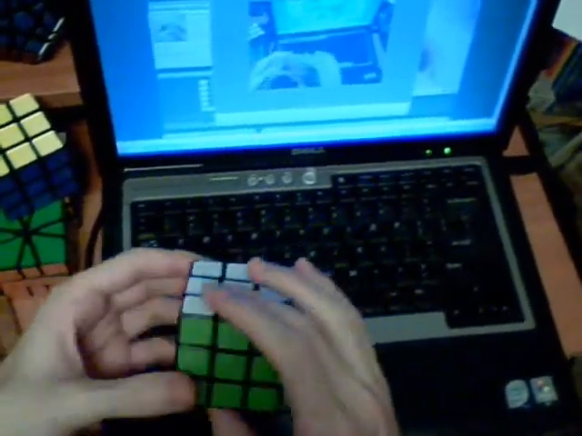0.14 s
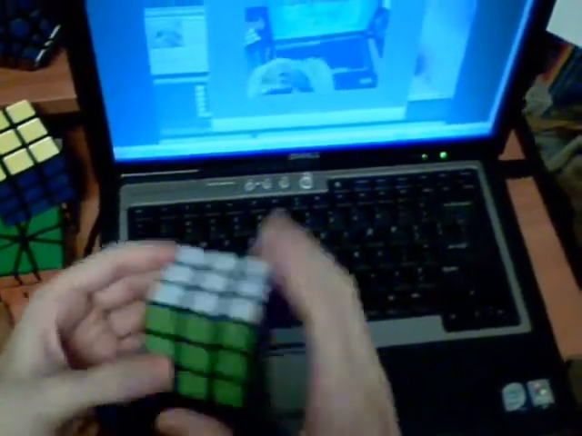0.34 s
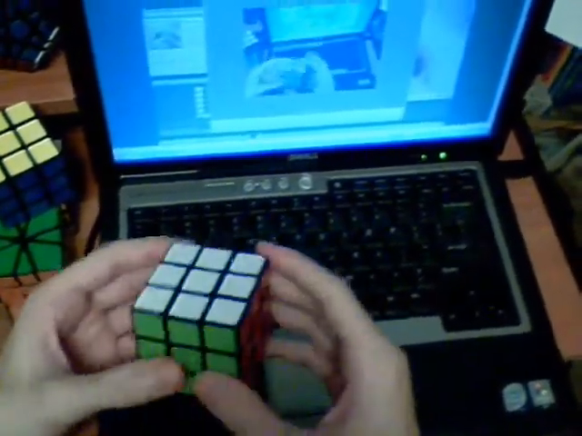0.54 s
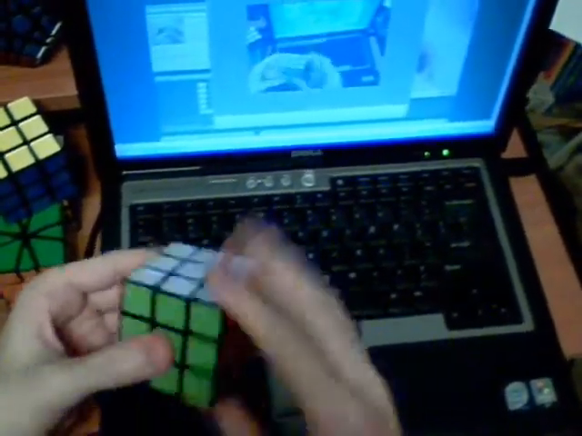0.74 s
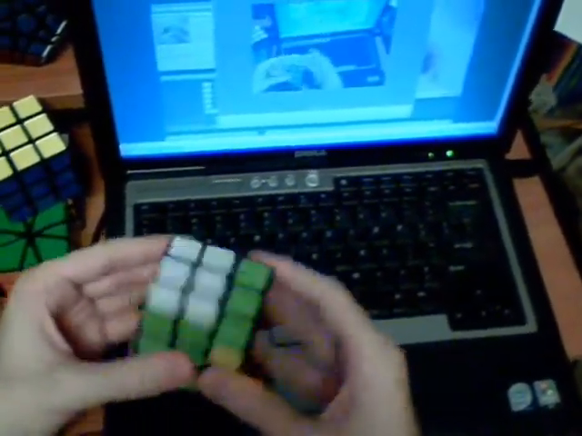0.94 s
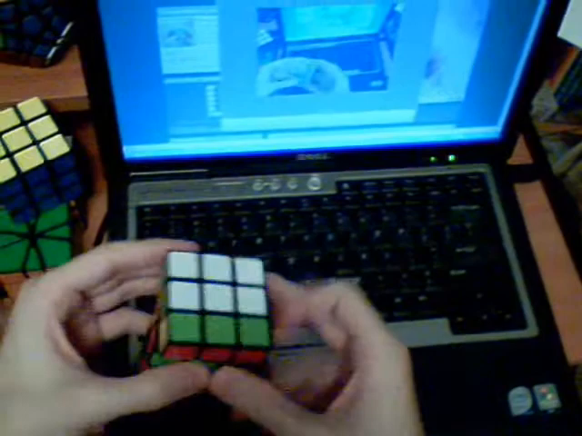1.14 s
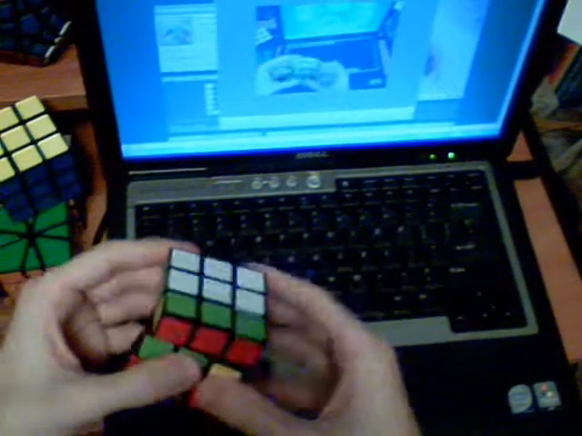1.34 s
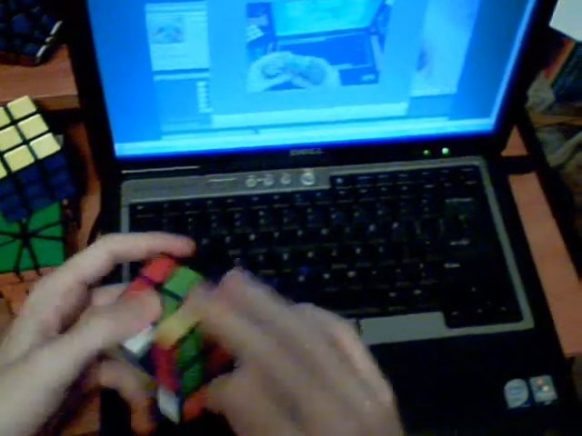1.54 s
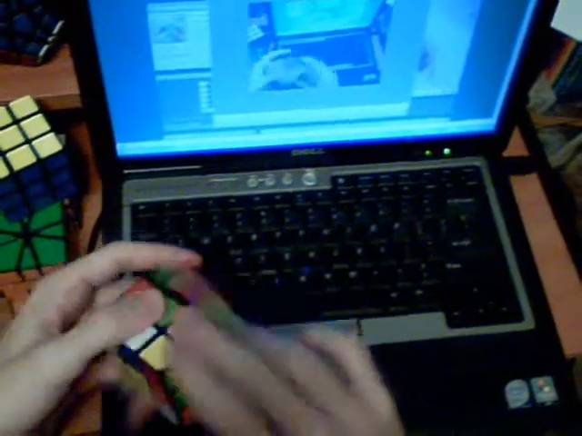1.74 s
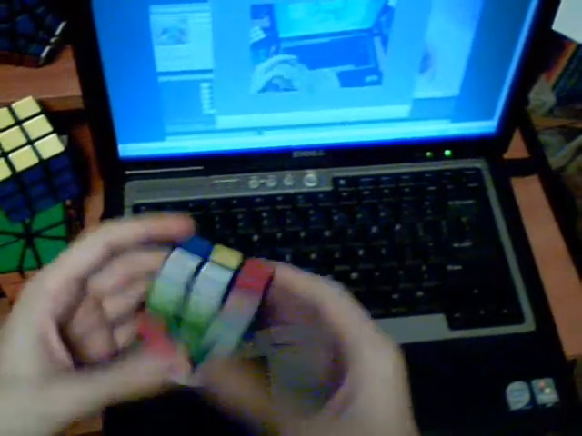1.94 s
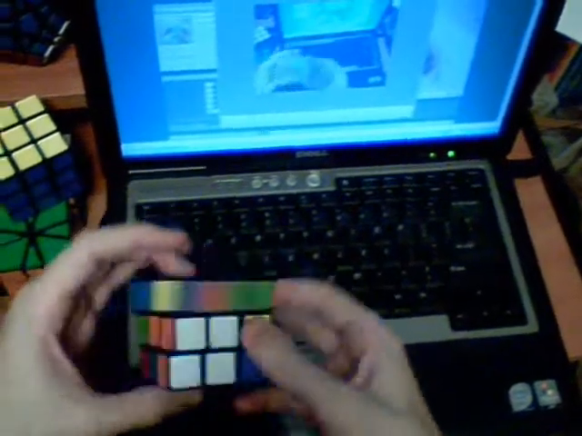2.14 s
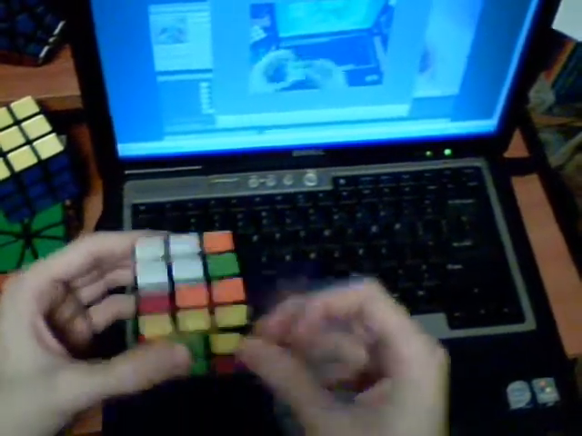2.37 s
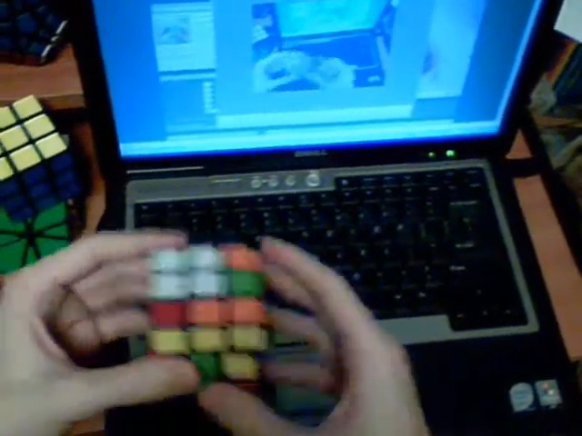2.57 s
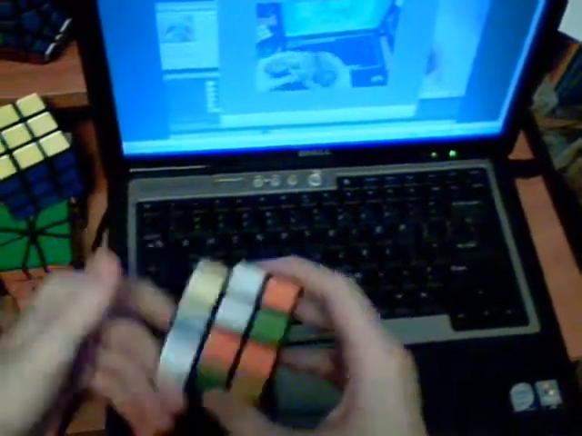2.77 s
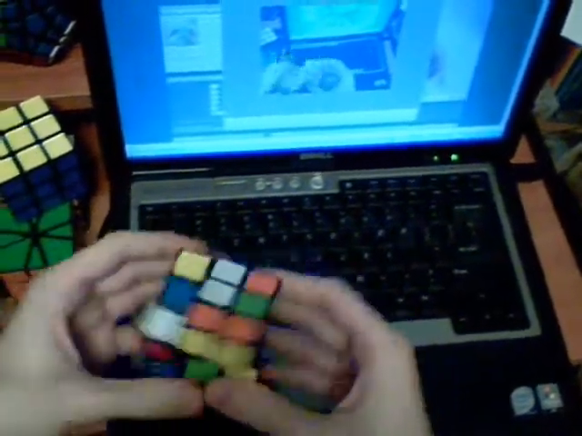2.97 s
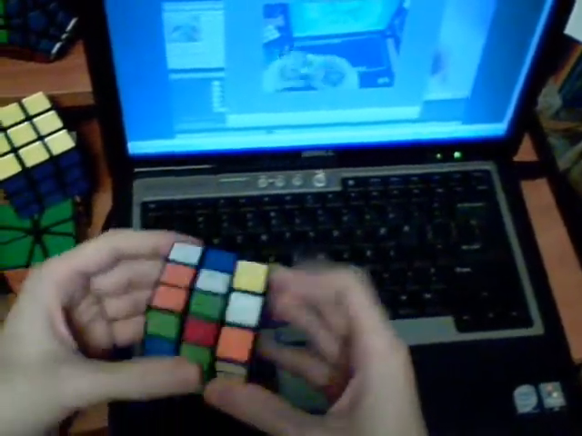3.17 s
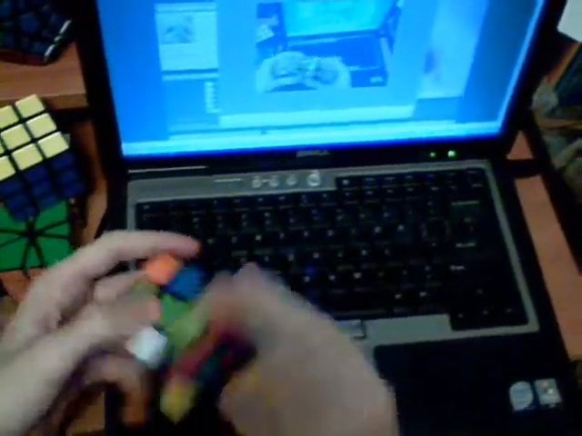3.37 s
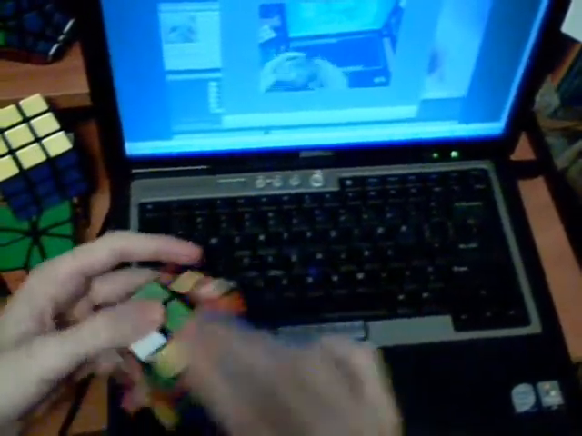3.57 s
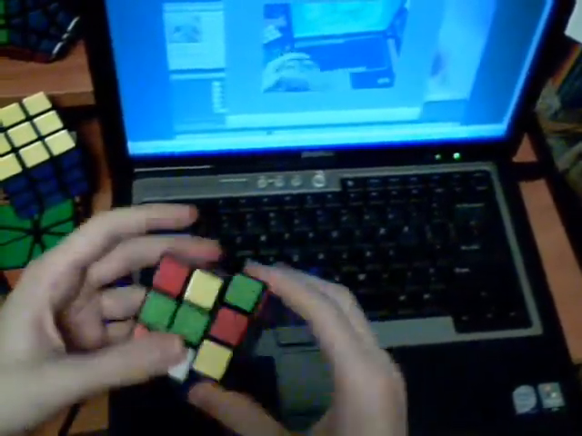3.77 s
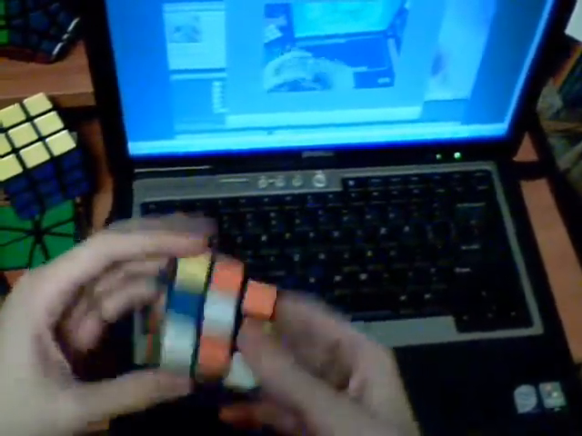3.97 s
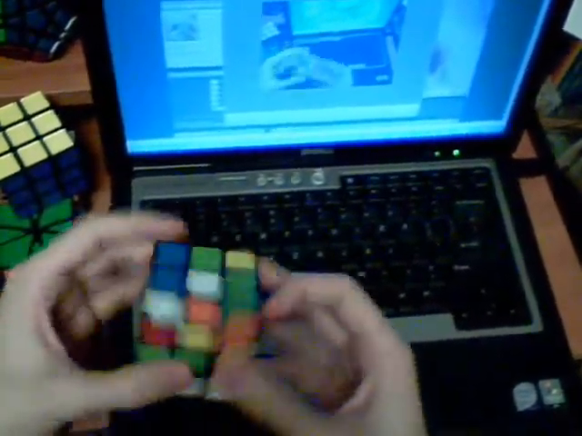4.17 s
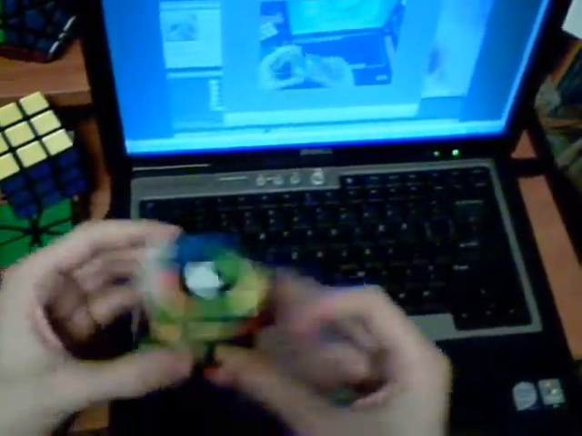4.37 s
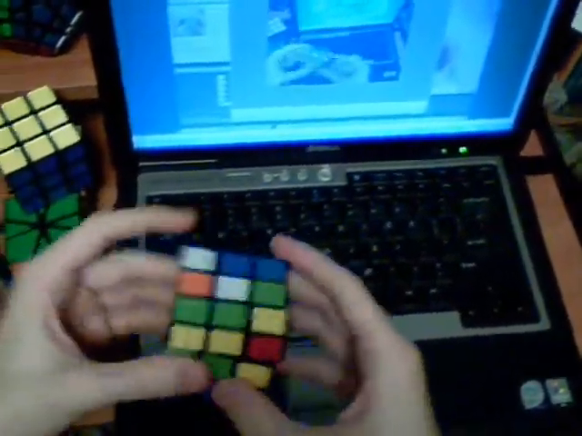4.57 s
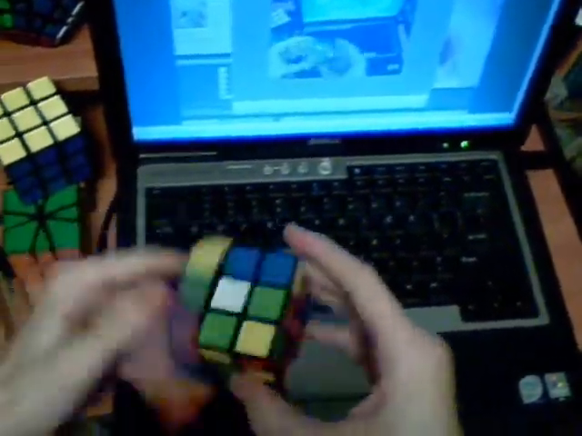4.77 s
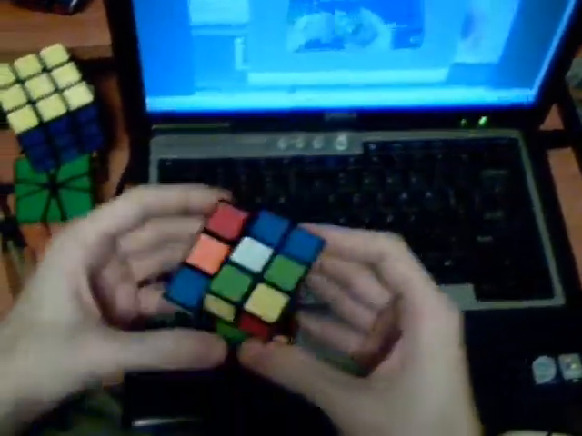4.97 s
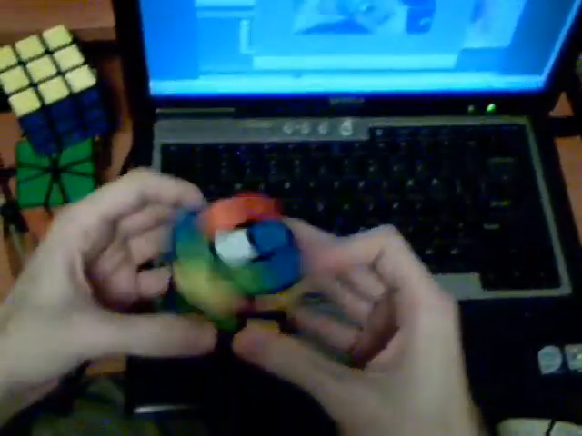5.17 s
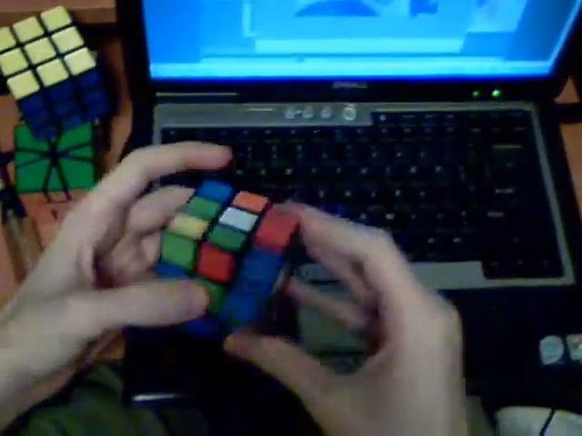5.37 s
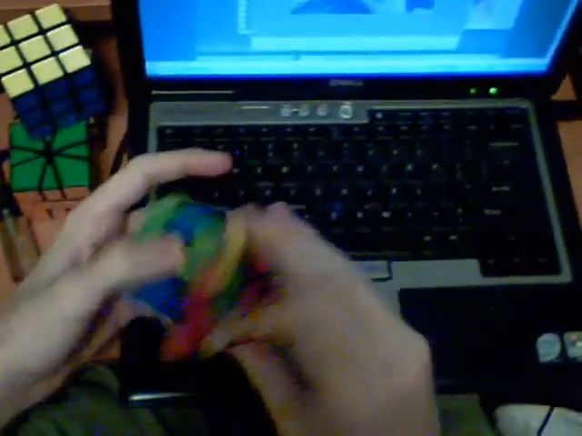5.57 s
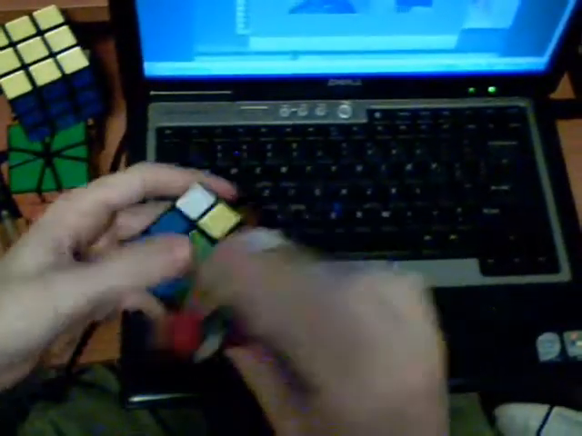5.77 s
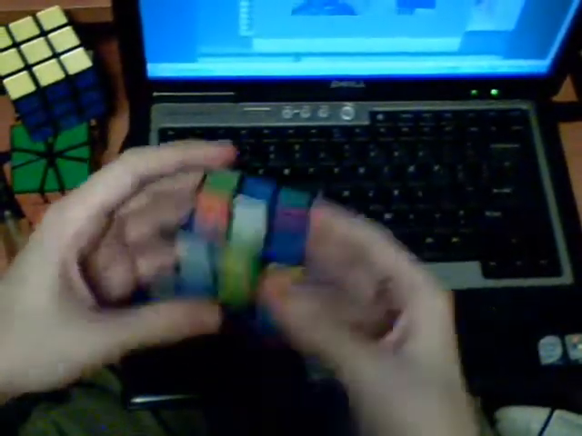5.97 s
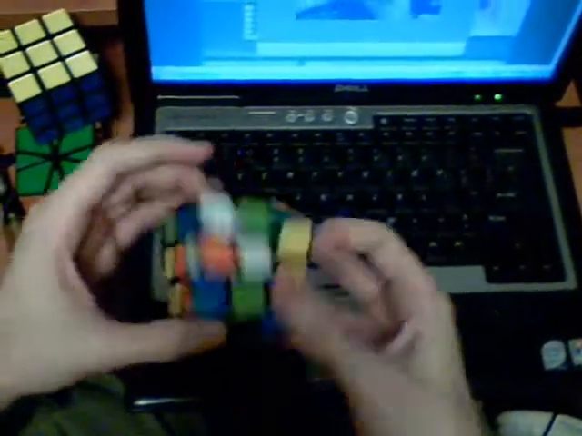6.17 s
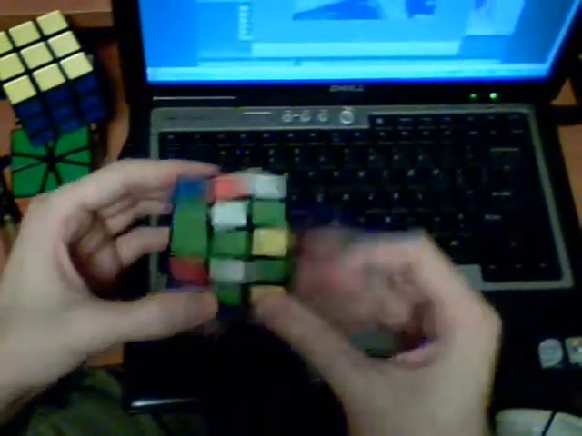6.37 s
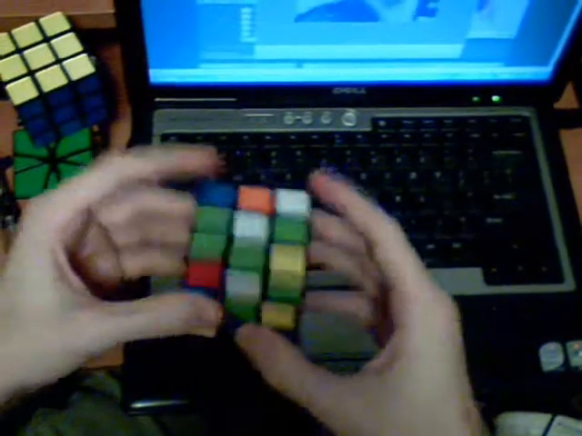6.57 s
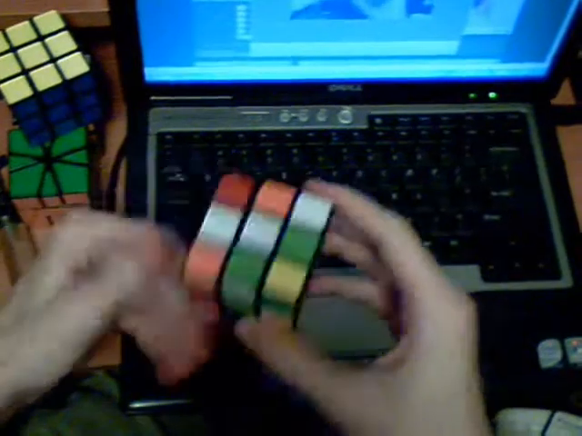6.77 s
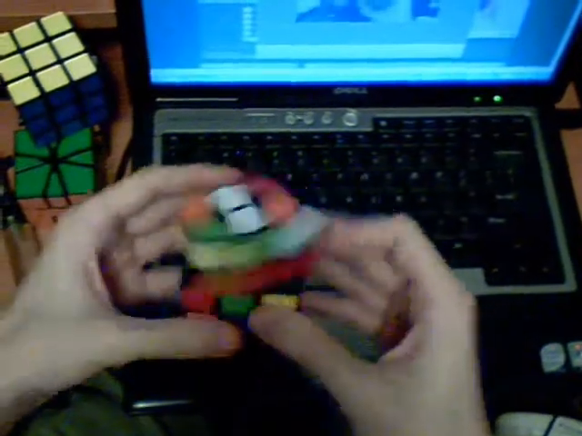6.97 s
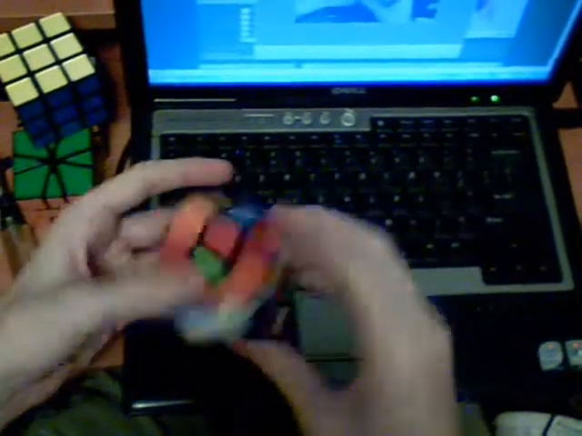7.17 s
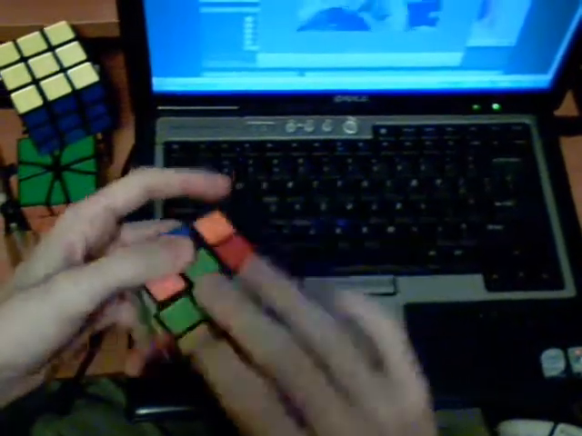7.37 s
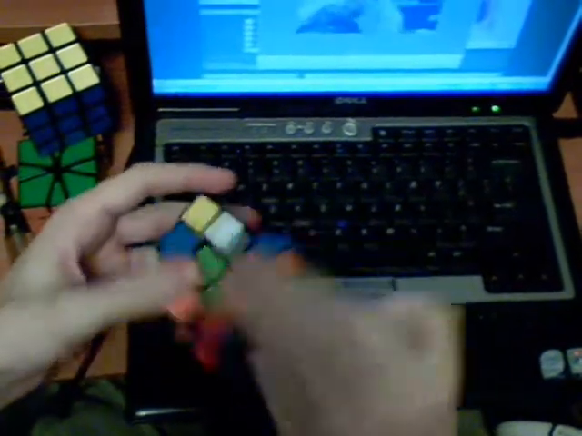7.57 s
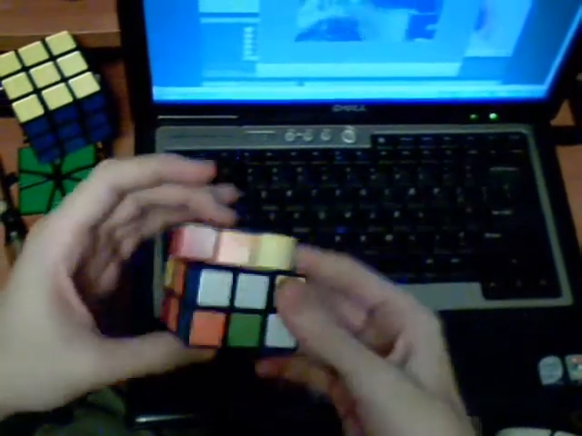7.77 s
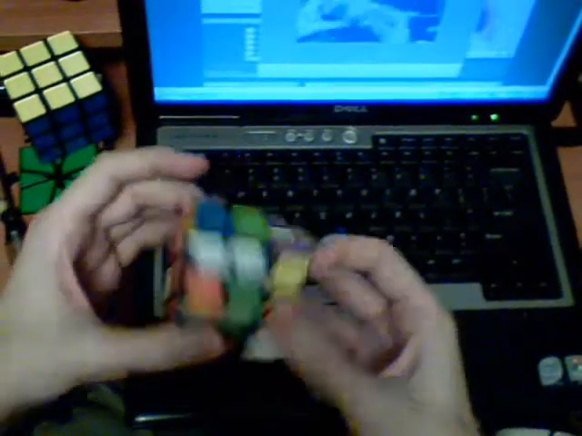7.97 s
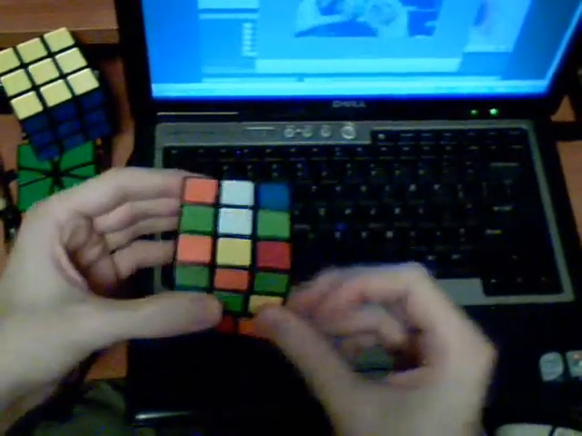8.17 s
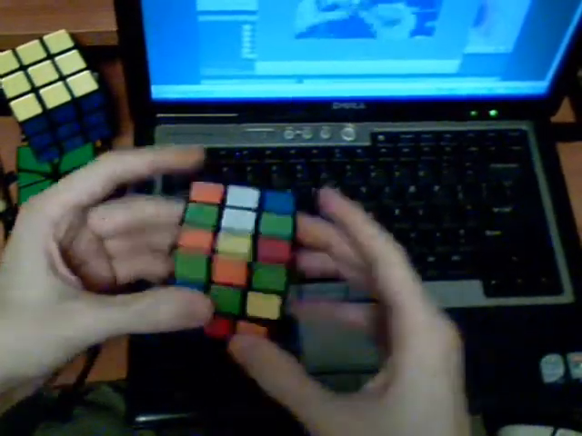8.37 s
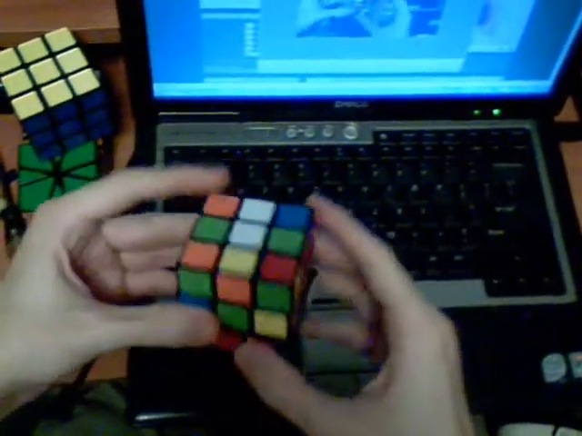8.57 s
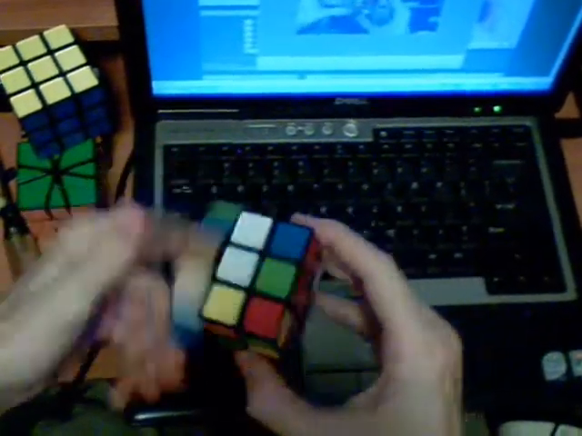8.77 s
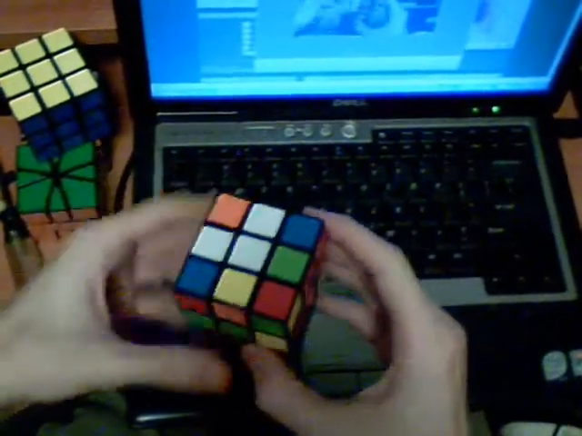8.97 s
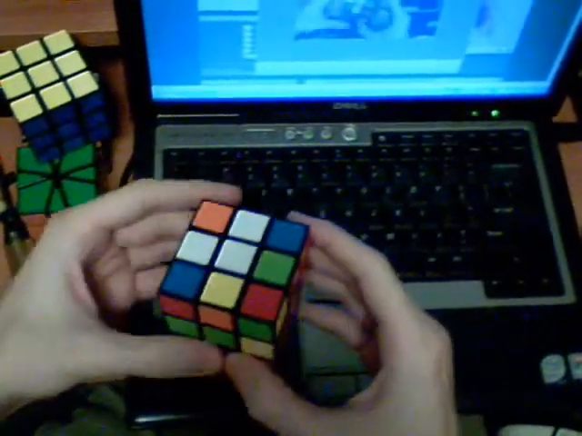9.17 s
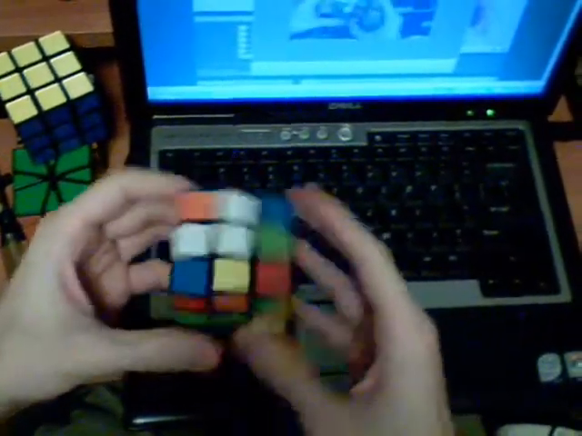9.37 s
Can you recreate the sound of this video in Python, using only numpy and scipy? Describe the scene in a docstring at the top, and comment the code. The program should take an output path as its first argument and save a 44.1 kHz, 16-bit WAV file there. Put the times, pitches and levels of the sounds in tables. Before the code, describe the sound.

A small, quiet room with the microphone close to the hands. From 0 to 0.8 seconds only a laptop is heard: a low wavering hum, a thin whine, soft vent air and faint high hiss. Then a plastic puzzle cube starts turning in fast, irregular clicks, with a strong snap near 1.4 and louder clacks at 1.8 and 2.0. Dense flurries follow around 2.7, 3.0 to 3.9 and a hard cluster at 4.3. After a short gap, clicks resume at 4.6, with lighter sliding ticks and steady snapping from 5.3 to 6.3. It thins briefly, then strong clacks strike near 7.2 and 7.5, loose pieces rattling around them. Clicking eases by 8.1, leaving a pause of about half a second; a last quick burst at 8.7 ends with a sharp clack. Only the quiet fan hum remains afterwards.

```python
"""Puzzle cube over a laptop

A plastic puzzle cube is twisted fast in two hands over a desk, close to the microphone.
Pieces snap past each other in clicks and clacks: noise bursts shaped by the plastic, each with a brief ring.
Soft ticks make the loose rattle and the sliding layers; every blow dies away in shaking pieces and a small room.
An open laptop hums with unsteady sine tones and blows with shaped noise underneath, below a faint high hiss."""
import sys
import numpy as np
from scipy.fft import rfft, irfft, next_fast_len
from scipy.io import wavfile
from scipy.ndimage import uniform_filter1d, map_coordinates

SR = 44100
rng = np.random.default_rng(int(sys.argv[2]) if len(sys.argv) > 2 else 0)


def digitize_waveform(pressure):
    """Quantize a signal to 16-bit integers and store it at the path in sys.argv[1].

    Rows of a 2-D input are taken as channels; values are limited to [-1, 1].
    """
    field = np.atleast_2d(pressure).T
    bounded = np.clip(field, -1, 1)
    quanta = np.round(bounded * 32767).astype(np.int16)
    wavfile.write(sys.argv[1], SR, quanta)


N = 415422

# disk spindle, the fan's blade rate with multiples, and a whine, before flutter:
# (frequency [Hz], rms level [dB])
LAPTOP_TONES = [(59, -62), (90, -55), (242, -54), (484, -56), (789, -54), (1578, -58)]
# air through the laptop's vent, before its slow swell: (frequency [Hz], density [dB per Hz])
VENT_AIR = [(20, -74.5), (45, -93), (110, -79.5), (170, -74), (300, -79), (430, -74.5), (680, -71.5),
            (880, -77.5), (1150, -81), (1500, -79), (2500, -79), (3300, -86.5), (5500, -97), (9000, -110)]
# snaps and single ticks of piece on piece, loud and soft, knock and thud relative to each:
# (time [s], level [dB], knock [dB], thud [dB])
PIECE_SNAPS = [(0.816, -6, -6, -18.5), (0.8188, -3.5, -11, -12), (0.8343, -10.5, -1, 6),
               (0.8747, -10.5, 6, -4), (0.8946, 2.5, -17, -19), (0.9144, -1, -7, -19),
               (0.9447, 6, -2.5, -6), (0.9803, -13, 7, 6), (0.989, -4, -2.5, -3), (1.0074, -11.5, -4, 7),
               (1.0252, -8, -4, -1), (1.0774, -13, -9, 1), (1.312, -18, -8, -5), (1.0884, -4.5, -5, -6),
               (1.1039, -5, 0, -2), (1.3629, -4, -6, -6), (1.3885, -1.5, -2, -14), (1.4013, -1.5, -4, -5),
               (1.432, -1, -1, -10), (1.4378, 11.5, -7.5, -14), (1.465, 0.5, -4, -0.5), (1.4763, -3, 0, -7),
               (1.4979, -2.5, 1.5, -2.5), (1.531, -5.5, 5, 2.5), (1.5435, 0, 0, -12),
               (1.588, -10.5, -5, -5), (1.633, 0, 0, -6), (1.7023, -5, 3, -12), (1.7087, -1, 1.5, -8),
               (1.7216, -4.5, 1, -5), (1.7705, -15, 1, 3), (1.8207, 14, -2, -5.5), (1.8942, -10, 2, 1),
               (1.931, 0, -2, -9), (1.9587, -7, 2.5, 4), (2.0195, 12, -14, -13.5), (2.0246, 6, -0.5, -5.5),
               (2.088, 0, -1.5, -2.5), (2.093, 2, -4.5, -11), (2.1514, -15, -3, -1),
               (2.1885, -4.5, -7, -4.5), (2.209, -11.5, 5.5, -2), (2.2193, -9, -1, 2),
               (2.2496, -3, -8, -17), (2.2924, -2.5, -1, -11), (2.2996, 2, -4.5, -11), (2.3193, 1, -3, -12),
               (2.3293, 6, -5, -9), (2.3385, -5.5, 0, -18), (2.4442, -6.5, -21, -24),
               (2.467, -13, -19, -15), (2.6215, -9, 2.5, -3), (2.6668, -6.5, 2, -3), (2.686, -0.5, -3, 8),
               (2.7051, 11, -3.5, -8), (2.7266, -6, 3, -3), (2.7446, 7, -4.5, -5.5),
               (2.9663, -12.5, -7, -5), (3.028, 6, -1.5, -9.5), (3.0478, -1, -4, -12),
               (3.054, 5, -7.5, -8.5), (3.116, -18, -6, -8), (3.138, -20, 1, -8), (3.187, -15, -4, -5),
               (3.2088, -18, -3, 4), (3.2302, -13, 3, -9), (3.2454, -6, -16, -6), (3.2621, 9.5, -4, -6),
               (3.2833, -4, -2, -3), (3.2944, -6, 7, -9), (3.31, 2.5, -0.5, -2), (3.3194, 6, -5, -6),
               (3.3504, -6.5, 5, -2), (3.4351, -6.5, 5, -4.5), (3.469, -16.5, 0, 0),
               (3.5274, -1.5, -7, -14), (3.5618, 4.5, 1.5, -5), (3.5679, 10, -3.5, -12),
               (3.5763, 6, -5, -12), (3.6824, -11, 2, -10), (3.6885, -0.5, -2, -6),
               (3.6963, 10.5, -8.5, -10.5), (3.7002, -3.5, 0, 0.5), (3.708, -2, -0.5, -2),
               (3.8163, -8, 3, 3.5), (3.821, -3, -1, -9), (3.8446, -3.5, 2, 4), (3.8648, -8.5, -2, 1),
               (3.882, -5, 4, -6), (4.0922, -5, 1.5, -3), (4.1174, -10.5, 5.5, -9), (4.1851, 0, -4, -9),
               (4.19, -3.5, -1, -7), (4.2794, -17, -1, -12), (4.2953, 6.5, -3, 1), (4.299, 10, -3, -19),
               (4.311, 0, 7.5, 2.5), (4.319, 12, -6.5, -31), (4.3218, 10, -9, -6.5), (4.684, 0.5, -9, -7),
               (4.715, -5, 4.5, -1.5), (4.7246, -1, -10, -6), (4.7414, -4, 2.5, 0.5),
               (4.931, -13.5, -4, 6.5), (5.018, -16, -7, -7), (5.088, -8, -3, -3), (5.1067, 5.5, -7.5, -11),
               (5.1352, 2, -8, -6.5), (5.3509, -11, 10.5, 1), (5.4405, 6.5, -5.5, -3),
               (5.4593, 2, -4.5, -23), (5.5358, -2, 4.5, -7), (5.5445, -4, -0.5, -4),
               (5.604, -3.5, -2.5, -4), (5.6752, -6, 6.5, 2), (5.6822, 5.5, -4.5, -22),
               (5.6994, -9, -3, 2.5), (5.7675, -10.5, 7, 2), (5.7855, -11, 4, -10), (5.8586, -2, -1.5, -6),
               (5.8933, -3.5, 2, -4), (5.9239, -6, 2.5, 3), (5.9759, -0.5, 5.5, 2), (5.9806, 3, -0.5, -23),
               (6.0131, -6, -4, -6), (6.0434, -11, 0, 0), (6.1471, -6.5, -2, -1), (6.1657, -3, -2, -15),
               (6.2118, 0.5, -3.5, -11), (6.2632, 0, -4, -3.5), (6.2738, -2, -2, -5),
               (6.3131, -6.5, -2.5, -4), (6.4152, -16.5, -9, -11), (6.5613, -9.5, -9, -6),
               (6.6433, -4, -13, -7), (6.6624, -6, 2, 2), (6.6969, -4.5, -0.5, -8), (6.9032, 5, -1.5, -7),
               (7.005, -14, -12, -3), (7.0736, -15, 2, 1), (7.1187, -9.5, 4, 3), (7.1416, -5.5, 2.5, 4),
               (7.1608, -5.5, 2, 8), (7.1658, 11.5, -7.5, -6.5), (7.1986, -3, 4.5, -2), (7.2058, 5, -7, -6),
               (7.2271, -3, 3.5, -1), (7.2415, -8, 3, 4), (7.2918, -14, -6, -20.5), (7.343, -3, -2, -10),
               (7.421, -6.5, 0, -4), (7.428, -7, 0, 2), (7.441, 5, 0.5, -0.5), (7.447, -4, -4, -3),
               (7.529, 2, 4, -1.5), (7.533, 11.5, -3.5, -13.5), (7.5618, -10, 0, -10),
               (7.5897, -6, -9, -14), (7.6479, 2, -9, -6), (7.6582, -2.5, -3, 1), (7.689, -3.5, -4.5, -8),
               (7.7194, -3, -1, -3), (7.7869, -5, -1.5, -6), (7.8882, -9.5, -1, -3), (7.8996, -10, -4, 2),
               (7.985, -4.5, 2, -11), (8.0497, -8, 3.5, -2), (8.0759, -6, -10, -7), (8.0621, -2, -16, -14),
               (8.099, -4.5, -4, -5), (8.6844, -5.5, 4, -18), (8.7103, -5, -6, -24), (8.7294, -5.5, 6, -2),
               (8.7339, -10, 7, -2), (8.7622, -5, 3, -12), (8.7647, 9.5, -5, 0.5)]
# stretches in which a layer slides round, catching softly as it goes:
# (start [s], length [s], middle catch level [dB])
LAYER_SLIDES = [(1.89, 0.095, -9.5), (2.3, .045, -9.5), (2.659, 0.051, -9.5), (2.993, 0.03, -9.5),
                (3.361, 0.038, -9.5), (3.831, .12, -11), (3.985, .045, -11.5), (4.093, 0.071, -10.5),
                (4.62, .14, -10.5), (4.918, 0.036, -13), (5.063, 0.072, -16.5), (5.311, .11, -15),
                (5.471, 0.068, -11), (5.701, .14, -13), (5.865, 0.092, -8.5), (6.08, .16, -14.5),
                (6.57, .12, -16), (6.88, 0.018, -12.5), (7.118, .025, -14), (7.254, .02, -8),
                (7.506, 0.16, -11), (7.91, 0.042, -16.5), (8.665, 0.07, -13.5)]
# what the cube and the microphone favour within each part: (frequency [Hz], relative level [dB])
CUBE_COLOUR = [(120, -23.5), (380, -13), (510, 2), (720, -2), (930, -11), (1200, -4), (2350, -6),
               (3400, -9), (4000, -2), (6500, 5), (8100, -4), (9500, -2.5), (11900, -10), (12800, -20.5),
               (15300, -13), (16400, -47)]
# faint high hiss, closing just below 16 kHz: (frequency [Hz], density [dB per Hz])
HIGH_HISS = [(6000, -92.5), (15600, -93), (15900, -140)]

# range of each part [Hz]: the body thuds, hollow pieces knock, thin walls click, sharp edges tick
BODY, HOLLOW, WALLS, EDGES = (60, 950), (950, 3200), (3200, 8000), (8000, 17000)
LEAD = 700  # room for grinding ahead of each contact [samples]
CATCH_GAP_S, CATCH_SPREAD_DB = 0.015, 7  # mean wait between soft catches, range of their strength
CATCH_KNOCK_DB, CATCH_THUD_DB = -2.5, -2.5  # middle values, relative to the catch
CATCH_COLOUR_DB = 13  # range of knock and thud from catch to catch
TOP_HZ = 16500  # band limit


def amp(db):
    """Gain of a dB value."""
    return 10 ** (np.asarray(db) / 20)


def along(points, hz):
    """Values at hz, read from (frequency, value) points on a log axis."""
    f, v = np.transpose(points)
    return np.interp(np.log(hz + 1), np.log(f + 1), v)


def wobble(rate):
    """A smooth random curve, rate knots a second."""
    knots = rng.standard_normal(int(N * rate / SR) + 4)
    return map_coordinates(knots, [np.arange(N) * rate / SR])


def filtered(x, response):
    """Shape the spectrum of x by a response of frequency."""
    m = next_fast_len(N + 8192)
    return irfft(rfft(x, m) * response(np.fft.rfftfreq(m, 1 / SR)), m)[..., :N]


def noise(spectrum):
    """White noise shaped to the given dB per Hz."""
    return filtered(rng.standard_normal(N), lambda hz: np.sqrt(SR / 2) * amp(along(spectrum, hz)))


def laptop():
    """Motor tones wander in pitch and flutter in level over the slowly swelling rush of the vent."""
    drift = np.cumsum(1 + 0.00158 * wobble(4)) / SR  # motor speed wanders, all tones together
    tones = 0
    for hz, db in LAPTOP_TONES:
        flutter = amp(np.log(hz / 30) * 0.55 * wobble(16))  # high tones flutter more
        phase = 2 * np.pi * (hz * drift + rng.random())
        tones = tones + np.sqrt(2) * amp(db) * flutter * np.sin(phase)
    return tones + amp(0.75 * wobble(2.72)) * noise(VENT_AIR)


def causal(db):
    """Minimum-phase response with these dB on an FFT grid, so a filtered blow keeps its sudden start."""
    cepstrum = irfft(np.log(amp(db) + 1e-5))
    half = len(cepstrum) // 2
    cepstrum[1:half] *= 2
    cepstrum[half + 1:] = 0
    return np.exp(rfft(cepstrum))


def part(span, db, contact, shake_db, t60, size):
    """Rough contacts, one a row, fading by e in `contact` s; pieces grind before, then shake and echo."""
    t = (np.arange(size) - LEAD) / SR
    hz = np.fft.rfftfreq(size, 1 / SR) + 1
    skirts = 1 / (1 + (span[0] / hz) ** 10) / (1 + (hz / span[1]) ** 10)
    response = causal(along(CUBE_COLOUR, hz) + 10 * np.log10(skirts))
    rough, loose, lumps = rng.standard_normal((len(db), 3, size)).transpose(1, 0, 2)

    u = t / contact[:, None]
    blow = rough * np.exp(np.where(u < 0, 5 * u, -u))  # sudden start
    tiny_knocks = amp(11.5 * uniform_filter1d(lumps, size=40))  # the shaking comes in lumps
    grind_then_decay = np.where(t < 0, 1.42 * np.exp(t / 0.0031), amp(-60 * t / t60))
    shake = loose * tiny_knocks * grind_then_decay

    # every blow lands on another piece, which rings briefly at its own pitch
    pitch = span[1] * rng.uniform(0.37, 0.8, (len(db), 1))
    ring = 2.2 * 1j * hz * pitch / (9 * (pitch ** 2 - hz ** 2) + 1j * hz * pitch)
    piece = 1 + ring
    blow, shake = irfft(rfft([blow, shake]) * response * [piece, np.ones_like(piece)], size)

    energy = lambda x: np.linalg.norm(x, axis=1, keepdims=True)
    even_blow = blow / energy(blow)
    even_shake = shake / energy(shake).mean()
    return amp(db)[:, None] * (even_blow + amp(shake_db) * even_shake)


def blows(s, db, knock_db, thud_db, contact, after, size):
    """Each blow sounds walls, edges, hollow pieces and body in its own shares; louder ones are brighter."""
    tick_db = -4.5 + 0.18 * db + 3.6 * rng.standard_normal(len(s))
    sound = part(WALLS, db - 4.5, 1.5 * contact, shake_db=-7.0, t60=0.19 * after, size=size)
    sound += part(EDGES, db + tick_db, 1.24 * contact, shake_db=-8.5, t60=0.16 * after, size=size)
    sound += part(HOLLOW, db + knock_db, 1.42 * contact, shake_db=-2.5, t60=0.16 * after, size=size)
    sound += part(BODY, db + thud_db, 0.93 * contact, shake_db=-6.0, t60=0.13 * after, size=size)
    at = np.round(s * SR).astype(int)[:, None] - LEAD + np.arange(size)
    return np.bincount(at.ravel(), sound.ravel(), N + SR)[:N]


def snaps(rows):
    """Pieces catch and snap into line; in louder snaps several strike at once, so contact lasts longer."""
    contact = 0.00095 * amp(0.052 * rows[1])
    return blows(*rows, contact, after=0.98, size=5120)


def rattle(rows, count=4):
    """Around each snap or catch, loose pieces tick softly against their neighbours."""
    s, db = np.repeat(rows[:2], count, axis=1)
    luck = rng.random((len(s), 6))
    side = np.where(luck[:, 1] < 0.45, -1, 1)  # a little more often after than before
    apart = -0.014 * np.log(1 - luck[:, 0]) * side
    db = 0.5 * db - 21 - 150 * np.abs(apart) + 9 * luck[:, 2]  # softer further away
    knock_db = -2 + 6 * luck[:, 3]
    thud_db = -8 + 8 * luck[:, 4]
    contact = 0.00031 + 0.00094 * luck[:, 5]
    return blows(s + apart, db, knock_db, thud_db, contact, after=0.19, size=1280)


def catches(count=20):
    """Rows like PIECE_SNAPS: one catch at a chance moment in each wait, while the layer slides."""
    start, length, db = np.transpose(LAYER_SLIDES)[:, :, None]
    luck = rng.random((4, len(LAYER_SLIDES), count))
    since = CATCH_GAP_S * (np.arange(count) + luck[0])
    even = luck - 0.5
    level_db = db + CATCH_SPREAD_DB * even[1]
    knock_db = CATCH_KNOCK_DB + CATCH_COLOUR_DB * even[2]
    thud_db = CATCH_THUD_DB + CATCH_COLOUR_DB * even[3]
    rows = np.array([start + since, level_db, knock_db, thud_db])
    return rows[:, since < length]


def slides(rows):
    """Soft catches touch briefly and die away sooner than snaps, so they stay separate ticks."""
    return blows(*rows, np.full(rows.shape[1], 0.0007), after=0.74, size=3072)


def scene():
    """The cube over the laptop."""
    snap_rows, catch_rows = np.transpose(PIECE_SNAPS), catches()
    cube = snaps(snap_rows) + slides(catch_rows) + rattle(np.hstack([snap_rows, catch_rows]))
    return (laptop() + cube)[None]


def record(dry):
    """A faint high hiss, smooth overload on the loudest clacks, then the band limit."""
    x = dry + noise(HIGH_HISS)
    x = x / (1 + np.abs(x / 0.97) ** 8) ** (1 / 8)
    return filtered(x, lambda hz: hz < TOP_HZ)


dry = scene()
out = record(dry)
digitize_waveform(out)
```